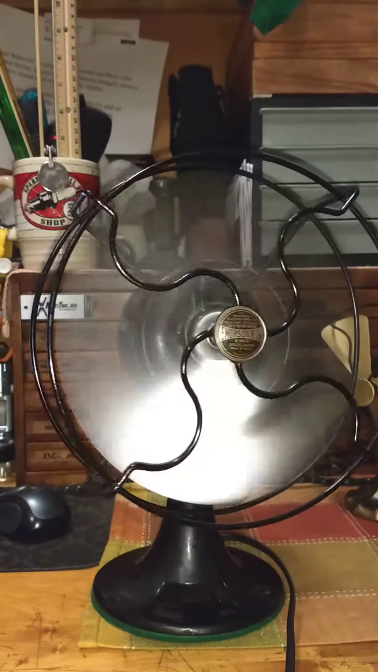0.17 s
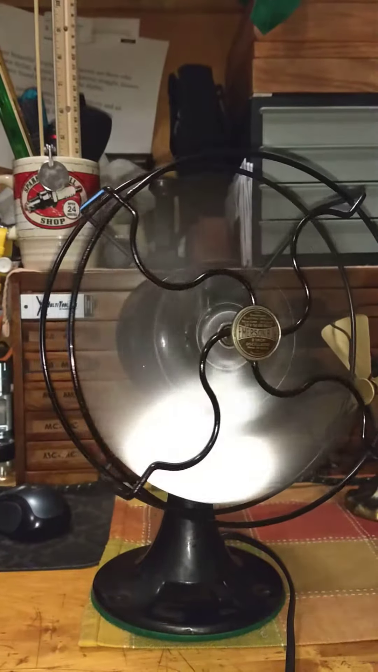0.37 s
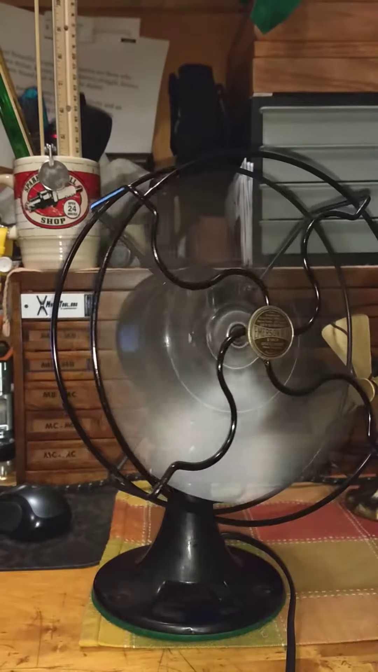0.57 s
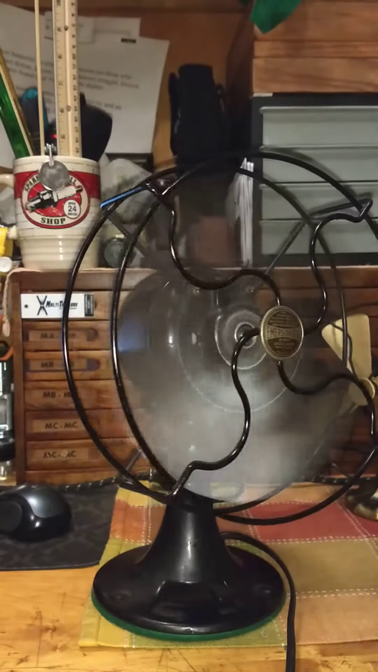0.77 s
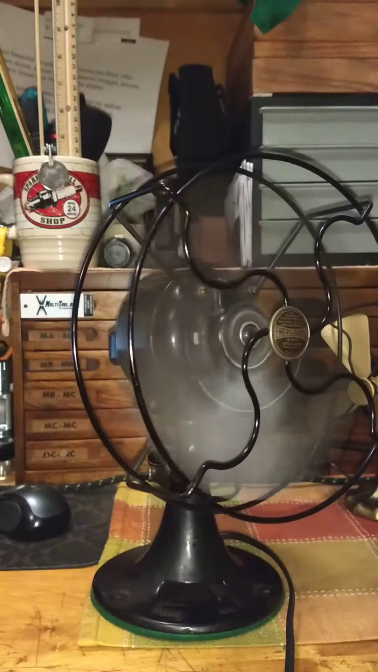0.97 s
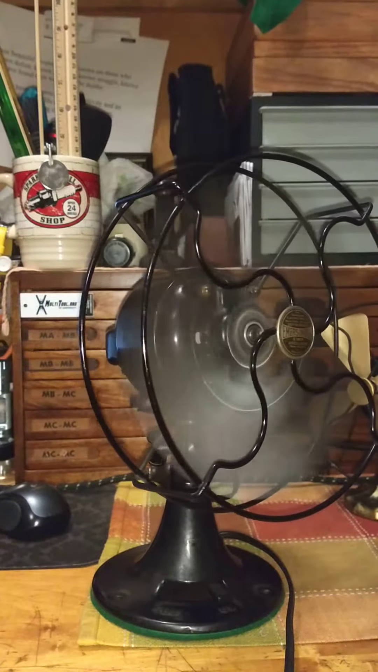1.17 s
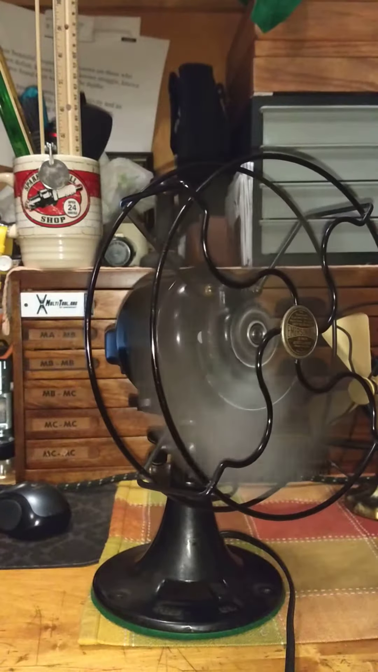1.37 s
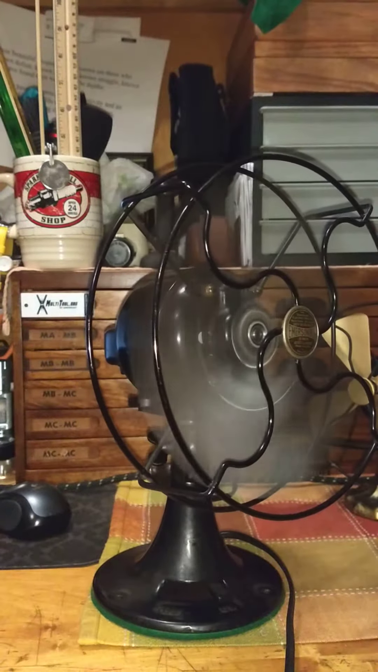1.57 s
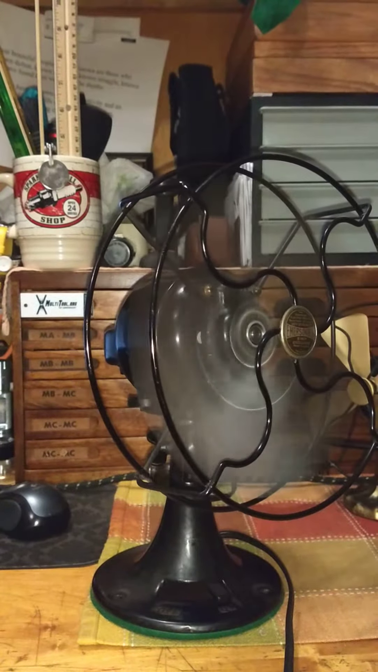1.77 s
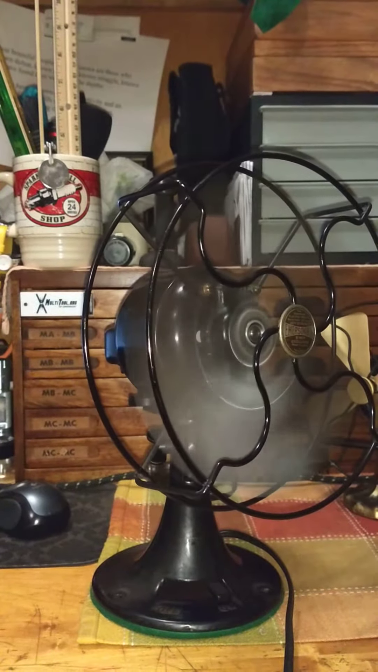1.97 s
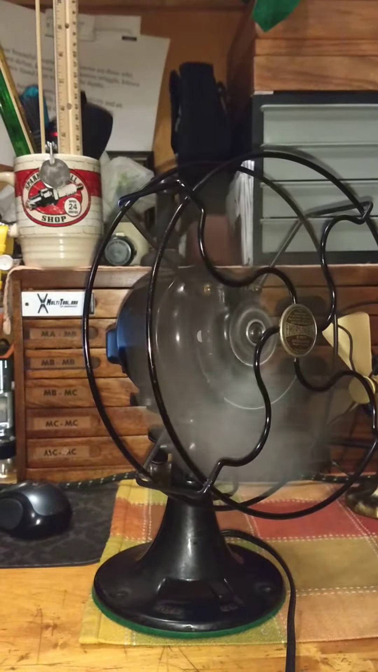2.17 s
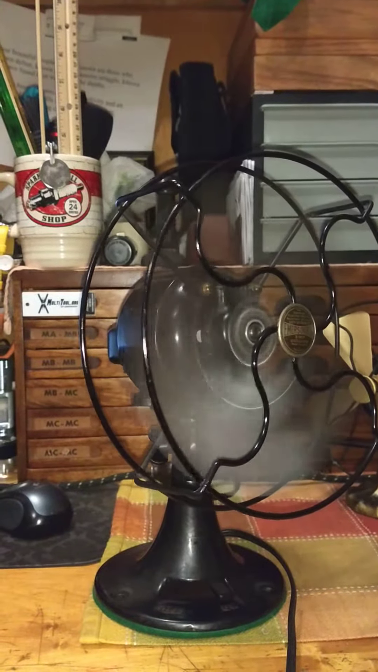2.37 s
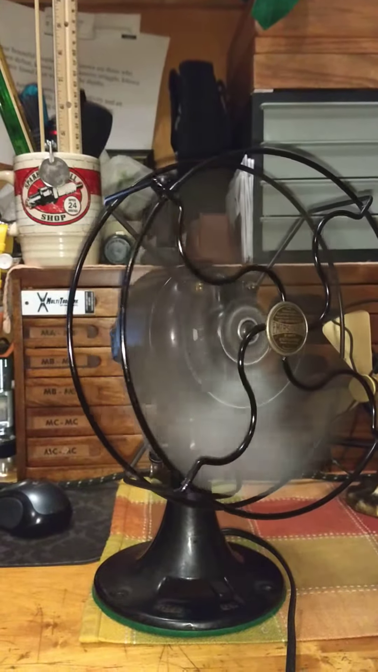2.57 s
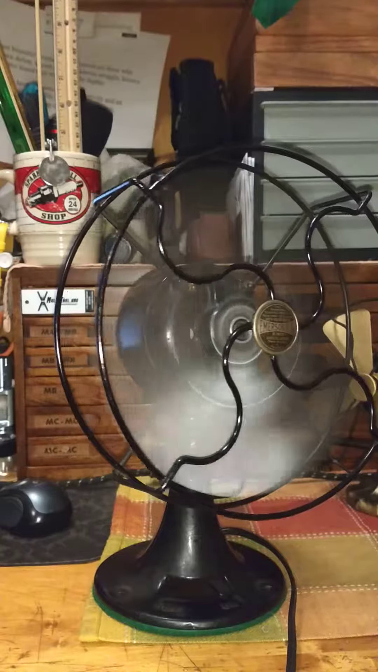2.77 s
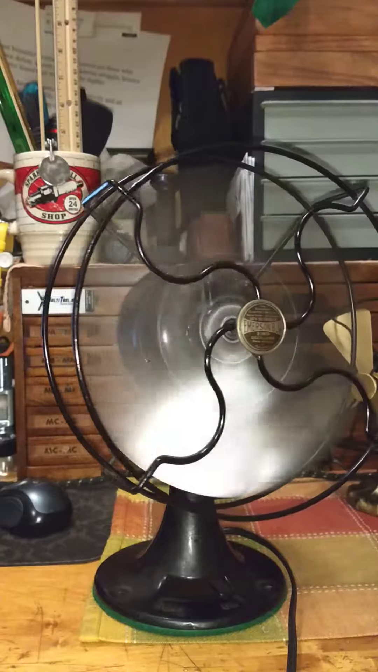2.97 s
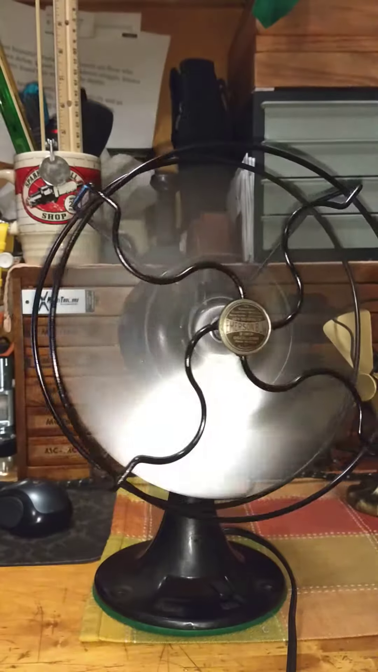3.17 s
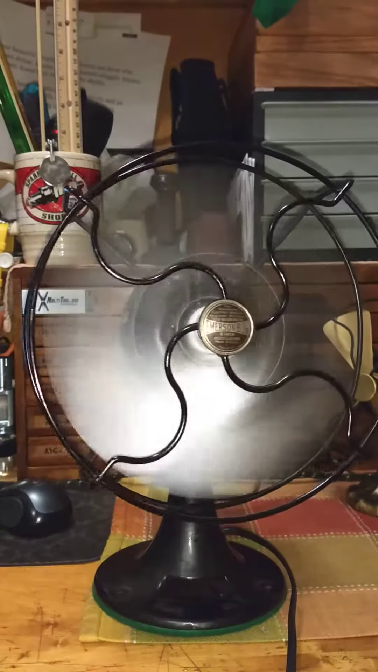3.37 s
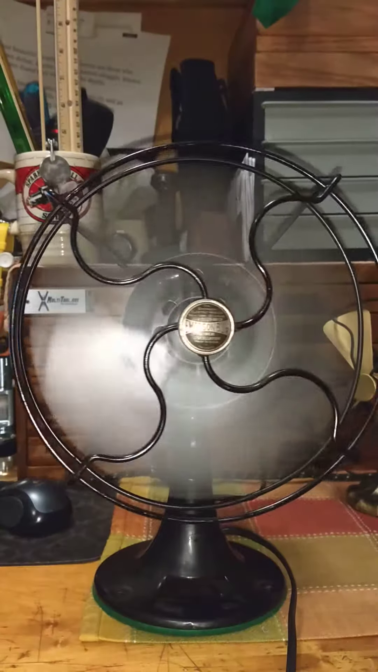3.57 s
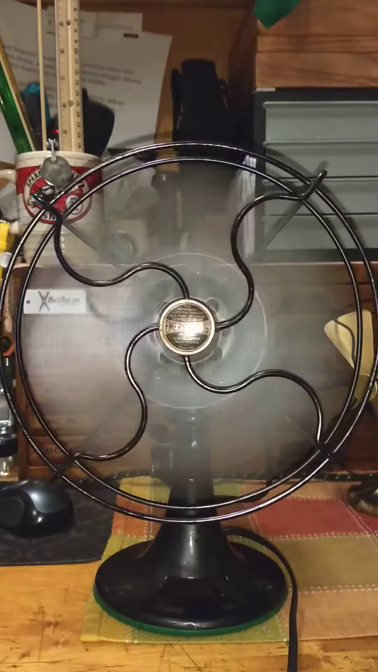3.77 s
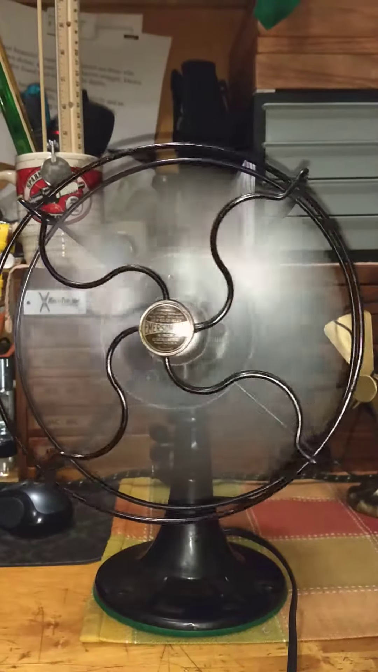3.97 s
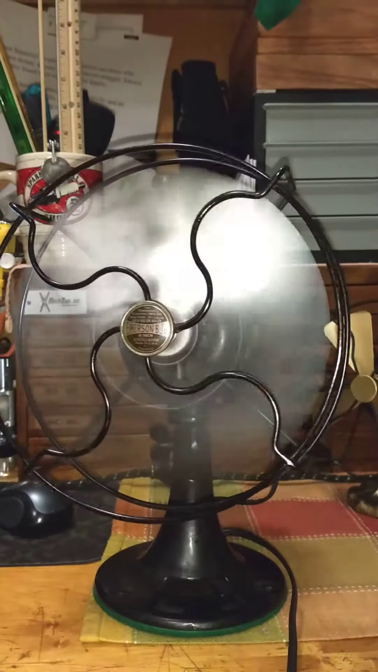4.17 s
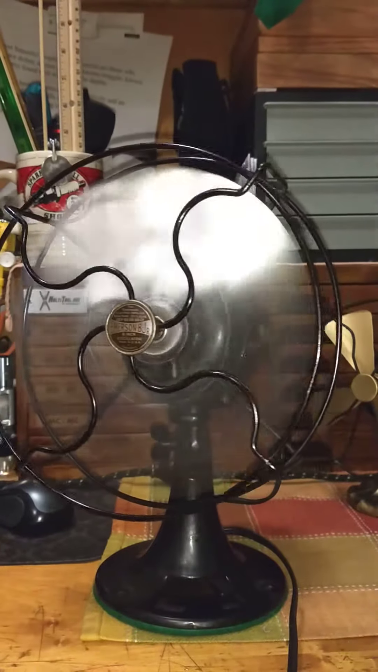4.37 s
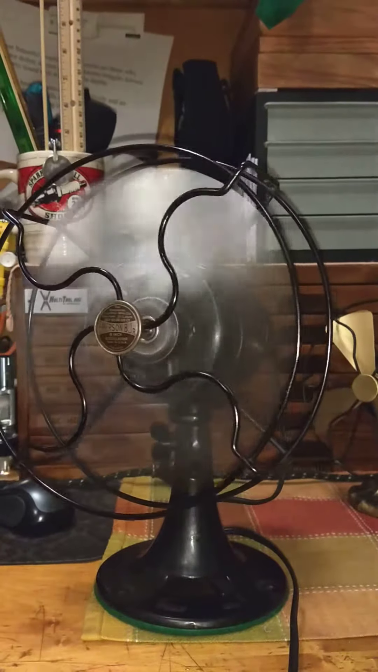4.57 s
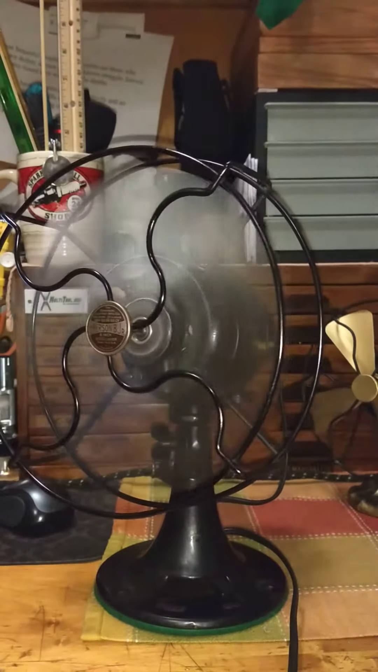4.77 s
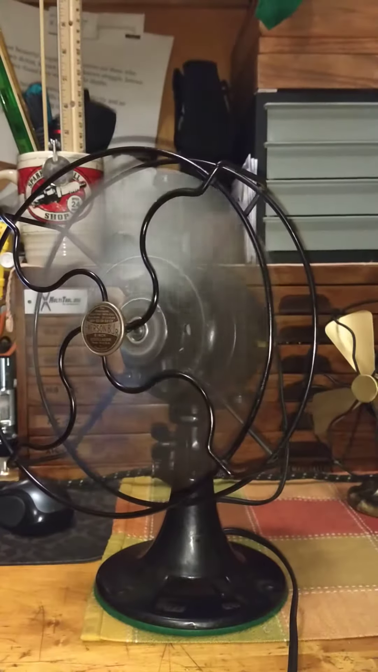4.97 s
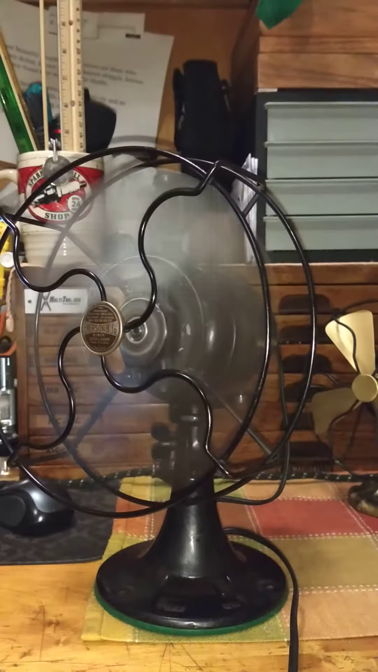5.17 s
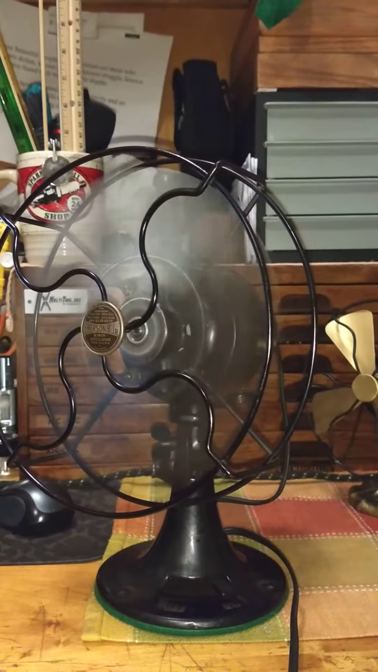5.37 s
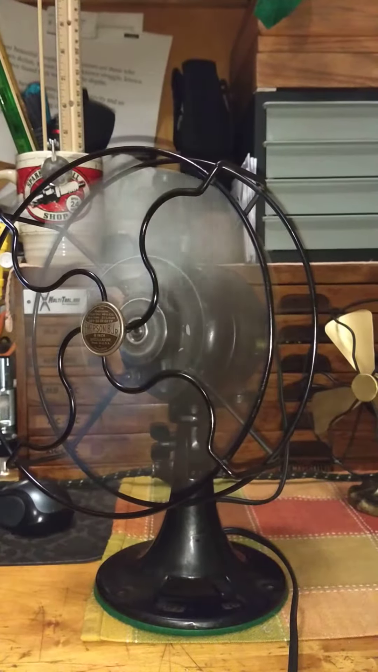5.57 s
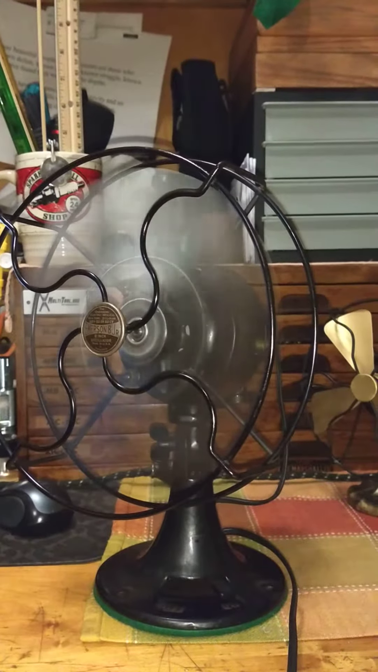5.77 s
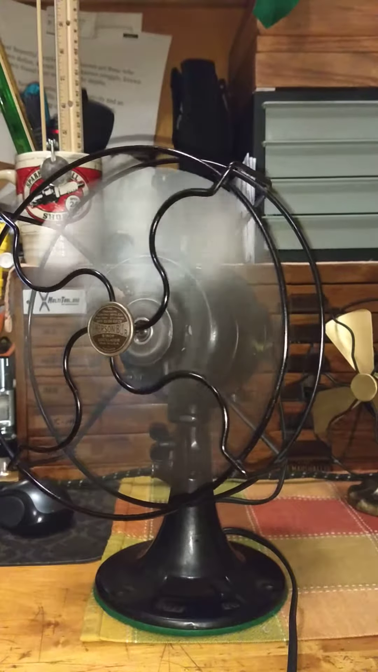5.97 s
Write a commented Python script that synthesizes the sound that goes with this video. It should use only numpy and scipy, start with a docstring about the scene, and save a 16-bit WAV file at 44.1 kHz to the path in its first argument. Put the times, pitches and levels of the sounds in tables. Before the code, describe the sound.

An old four-bladed desk fan runs without pause on a workbench indoors, close to a stereo microphone. Its steady low electric hum sits beneath a broad rush of air, faint wavering rotor tones and a slightly metallic ring. From 0 to about 0.45 s, quick dull wind thumps hit left and right, with the fan held down in level. They fade by 0.7 s, and the hum and rush gradually swell back. A higher casing buzz wavers, strongest around 2 s. Soft buffeting begins again near 3.3 s, becoming dense, low thumps by 3.5 s and the loudest, rougher, brighter blows around 3.9 to 4.4 s, ducking the whole fan. The gusts break off after 4.5 s, leaving a few weak puffs until 5 s. The hum and rush recover slowly, and the buzz swells again around 5.3 to 5.6 s before easing, with the fan still running.

```python
"""An old four-bladed desk fan swings from side to side on a workbench, humming and rushing throughout.
At first it has just faced the microphone: eddies thump on the two ports and the gain starts turned down.
The thumps die away as it turns aside; the fan swells back and its casing buzzes, strongly near 2 s.
Facing again near 3.8 s, it brings stronger thumps, and the gain control ducks everything.
Then it turns to the other side, the fan swells back and the buzz returns.
Tones are sines, air is filtered noise; left and right are the ports subtracted with a short delay."""
import sys
import numpy as np
from scipy import signal
from scipy.fft import rfft, irfft
from scipy.io import wavfile
from scipy.ndimage import uniform_filter1d, minimum_filter1d

SR = 44100
rng = np.random.default_rng(int(sys.argv[2]) if len(sys.argv) > 2 else 0)


def master_out(mix):
    """Clip the mix to full scale and print it as 16-bit PCM to the path in sys.argv[1]."""
    frames = np.transpose(np.atleast_2d(mix))
    ceiling = np.clip(frames, -1, 1)
    pcm = np.round(ceiling * 32767).astype(np.int16)
    wavfile.write(sys.argv[1], SR, pcm)


N = 264908
TIME = np.arange(N) / SR
MAINS_HZ = 60
SHAFT_HZ = 27.4   # turns of the rotor per second
ROTOR_WAVER_DB = 2.2   # spread of the slow wavering


def from_db(db):
    """Decibels to gain."""
    return 10 ** (np.asarray(db) / 20)


def on_log_axis(hz, points_hz, values):
    """Read a table at any frequency, in straight lines on a log frequency axis."""
    return np.interp(np.log(hz + 0.0012), np.log(points_hz), values)


def filtered(x, order, hz, kind):
    """Pass x through a smooth low, high or band filter."""
    return signal.sosfilt(signal.butter(order, hz, kind, fs=SR, output="sos"), x)


def drift(rate):
    """Random wandering of spread 1, changing about rate times a second."""
    hz = np.fft.rfftfreq(N, 1 / SR)
    noise = rfft(rng.standard_normal(N))
    slow = irfft(noise / (1 + (hz / rate) ** 4), N)
    return slow / slow.std()


def short_power(x, seconds):
    """Power under a sliding bell-shaped window."""
    window = np.hanning(int(seconds * SR))
    power = signal.fftconvolve(x ** 2, window[None] / window.sum(), "same", axes=1)
    return np.abs(power) + 1e-14


def at_ports(alike, opposed):
    """The pressure at the two ports from its common and its opposed part."""
    return np.array([alike + opposed, alike - opposed])


# the swing: a moment when the fan faces the ports, and the time from one side to the other
FACING_S, SWEEP_S = 3.8, 4.04


def swing(s):
    """How far the fan is turned: -1 left, 0 facing the ports, 1 right."""
    return np.sin(np.pi * (FACING_S - s) / SWEEP_S)


def turning(facing_db, left_db, right_db):
    """Gain of a source as the swing turns it from facing the ports to either side."""
    turned = swing(TIME)
    side_db = np.where(turned < 0, left_db, right_db)
    return from_db(facing_db + (side_db - facing_db) * turned ** 2)


def tones(table, base_hz, wander, waver_db):
    """Sines on multiples of one slightly wandering rate, each wavering in the moving air."""
    turn = 2 * np.pi * base_hz * np.cumsum(1 + wander * drift(2.1)) / SR
    out = np.zeros((2, N))
    for multiple, alike_db, opposed_db in table:
        angle = multiple * turn + rng.uniform(0, 2 * np.pi)
        alike = from_db(alike_db) * np.sin(angle)
        opposed = from_db(opposed_db) * np.cos(angle)
        out += np.sqrt(2) * at_ports(alike, opposed) * from_db(waver_db * drift(0.66))
    return out


# faint low tones, not tied to the shaft rate, before wandering and wavering:
# [f/Hz, level alike at both ports/dB, level opposed/dB]
LOW_TONES = [(92, -54.5, -61), (155.6, -46, -70.5)]


def low_tones():
    """Faint low tones, free of the shaft rate, wander a little in pitch and waver slowly in level."""
    return tones(LOW_TONES, 1.0, wander=0.0053, waver_db=ROTOR_WAVER_DB)


# magnetic hum of the motor, before the swing and wavering change it:
# [multiple of the mains, level alike at both ports/dB, level opposed/dB]
HUM_TONES = [(2, -27, -87), (4, -45, -69), (6, -55, -63), (8, -62, -58)]


def motor_hum():
    """The motor's magnetic pull hums on even multiples of the mains; the swing shades it."""
    gain = turning(facing_db=-4.5, left_db=-1.5, right_db=-4.5)
    return gain * tones(HUM_TONES, MAINS_HZ, wander=0.0005, waver_db=0.8)


# the higher buzz of the motor casing, before it swells and wavers:
# [multiple of the mains, level alike at both ports/dB, level opposed/dB]
BUZZ_TONES = [(10, -47, -63)]
# how the buzz swells and fades: [t/s, level/dB]
BUZZ_SWELL = [(0.6, -15), (0.9, -5), (1.45, -11.5), (1.8, 0), (2.1, 0.5), (2.45, -4), (3.3, -5.5),
              (3.8, -6.5), (4.7, -13), (5.3, -0.5), (5.6, 1.5), (5.9, -8.5)]


def casing_buzz():
    """The casing buzzes at ten times the mains, heard best near the ends of the swing."""
    swell_db = np.interp(TIME, *np.transpose(BUZZ_SWELL))
    return from_db(swell_db) * tones(BUZZ_TONES, MAINS_HZ, wander=0.0013, waver_db=1.6)


# tones of the rotor, before wavering:
# [multiple of the shaft rate, level alike at both ports/dB, level opposed/dB]
ROTOR_TONES = [(3.95, -57, -61.5), (8.04, -46.5, -74.5), (8.8, -62, -58.5), (10.15, -66.5, -56),
               (12.02, -47.5, -74), (15.95, -60.5, -60.5)]


def rotor_tones():
    """The turning blades beat the air, giving tones tied to the shaft rate."""
    return tones(ROTOR_TONES, SHAFT_HZ, wander=0.0024, waver_db=ROTOR_WAVER_DB)


# air rushing off the blades, at the ports, before the resonances:
# [f/Hz, level/dB per Hz, likeness of the two ports from -1 to 1]
RUSH_SPECTRUM = [(40, -81, 0.69), (71, -68, 0.54), (100, -64, 1), (159, -67, 0.82), (218, -59, 0.99),
                 (294, -70.5, 0.76), (384, -69, 1), (463, -74, 0.48), (730, -71.5, 0.56),
                 (1044, -75.5, 0.47), (1200, -71, 0.0019), (1400, -71.5, -0.14), (1940, -76, -0.14),
                 (2250, -72, 0.77), (3243, -79.5, -0.3), (6500, -91.5, 0.098), (8700, -100, -0.14),
                 (14900, -100.3, 0.26)]
# resonances of blades and guard that colour the rush: [f/Hz, width/Hz, boost/dB]
METAL_RESONANCES = [(660, 22, 2), (730, 13, 2.5), (787, 24, 2), (834, 20, 5), (869, 16, 7.5), (909, 30, 6),
                    (1067, 18, 9), (1090, 16, 5), (1350, 17, 0), (1518, 30, 3), (1730, 24, 1.5),
                    (1856, 40, 4)]


def rush(level_db=0.0, throb=0.05, flutter_db=0.36):
    """Turbulence off the blades, coloured by the metal; its hiss throbs once a turn."""
    hz = np.fft.rfftfreq(N, 1 / SR)
    points_hz, density_db, likeness = np.transpose(RUSH_SPECTRUM)
    colour_db = on_log_axis(hz, points_hz, density_db) + level_db
    for centre, width, peak_db in METAL_RESONANCES:
        colour_db = colour_db + peak_db / (1 + (2 * (hz - centre) / width) ** 2)
    alike = np.clip(on_log_axis(hz, points_hz, likeness), -.98, .98)
    # likeness shares the power between the common and the opposed part
    share = np.sqrt(SR / 2 * np.array([1 + alike, 1 - alike]) / 2)
    spectra = rfft(rng.standard_normal((2, N))) * from_db(colour_db) * share
    air = at_ports(*irfft(spectra, N))
    hiss = filtered(air, 1, 1800, "high")
    throbbing = air + throb * np.sin(2 * np.pi * SHAFT_HZ * TIME) * hiss
    return throbbing * from_db(flutter_db * drift(18.0))


def reflected(x, delay_s=0.006, sweep_s=0.00079, echo_db=-15.0):
    """A hard surface nearby returns the rush; the swing changes the path, sweeping a faint comb."""
    sent = TIME - delay_s - sweep_s * swing(TIME)
    echo = np.array([np.interp(sent, TIME, port, left=0) for port in x])
    return (x + from_db(echo_db) * echo) / np.hypot(1, from_db(echo_db))


def rushing_air(port_tilt_db=1.2):
    """The rush with its echo, shaded by the swing and a little stronger at the second port."""
    gain = turning(facing_db=1.0, left_db=0.52, right_db=0.34)
    tilt = from_db([[-port_tilt_db / 2], [port_tilt_db / 2]])
    return gain * reflected(rush()) * tilt


# travel time of the jet of air to the ports
JET_TRAVEL_S = 0.165
# the swing (share of the full turn) at which the jet's edge passes the ports, and the drop beyond it
JET_EDGE, JET_EDGE_DB = 0.325, -16.5


def jet_db(s, steepness=10.0, fringe_fall_db=2.0):
    """Strength of the draught at the ports: a flat core that drops at its edge to a fading fringe."""
    off_axis = np.abs(swing(s - JET_TRAVEL_S)) / JET_EDGE
    outside = 1 - 1 / (1 + off_axis ** steepness)
    return JET_EDGE_DB * outside - fringe_fall_db * off_axis ** 4


def rumble(level_db=-4.5, corner_hz=140, low_cut_hz=85, lumpy_db=3.5):
    """The dull churn between eddies: lumpy low noise, separate at each port."""
    noise = rng.standard_normal((2, N))
    churn = filtered(noise, 2, [low_cut_hz, corner_hz + low_cut_hz], "band")
    churn = filtered(churn, 2, 800, "low")
    churn = churn / np.sqrt(short_power(churn, 0.13).sum(0))   # even out its loudness
    return churn * from_db(jet_db(TIME) + level_db + lumpy_db * drift(21))


def small_eddies(per_s=60.0, level_db=-11.5, spread_db=1.0, core_hz=230, doubling_db=1.0,
                 spread_octaves=0.25):
    """Lesser eddies at uneven intervals; the stronger the draught, the louder and brighter."""
    chance = rng.standard_normal((400, 3))
    when = (np.arange(len(chance)) + chance[:, 0] / 2) / per_s
    strength_db = jet_db(when) + spread_db * chance[:, 1]
    octaves = strength_db / doubling_db + spread_octaves * chance[:, 2]
    corner_hz = np.maximum(core_hz * 2 ** octaves, 90)
    heard = (when > 0) & (when < N / SR) & (strength_db > -45)
    return np.transpose([when, strength_db + level_db, corner_hz])[heard]


def rounded_off(push, corner_hz, reach):
    """An eddy's spectrum slopes down from its corner and ends steeply at reach times the corner."""
    slope = signal.butter(1, corner_hz, fs=SR, output="sos")
    end = signal.butter(3, min(reach * corner_hz, SR / 4), fs=SR, output="sos")
    return signal.sosfilt(np.vstack([slope, slope, end]), push)


# the strongest eddies, and stray puffs beside the jet; small fast eddies have a higher corner:
# [t/s, peak level/dB before level_db and the wind filters, corner f/Hz]
STRONG_EDDIES = [(0.017, -1, 340), (0.032, -9, 201), (0.063, -0.5, 330), (0.072, 2, 160),
                 (0.092, -5.5, 323), (0.112, -1.5, 135), (0.126, -3, 260), (0.143, -4, 275),
                 (0.162, 4, 140), (0.184, -6, 170), (0.212, -1.5, 135), (0.232, -6.5, 220),
                 (0.246, -2, 200), (0.277, -1.5, 257), (0.311, -4, 337), (0.319, -2.5, 216),
                 (0.335, -11.5, 170), (0.365, -1.5, 170), (0.389, -4, 180), (0.423, -11, 250),
                 (0.429, -2.5, 115), (0.443, -12, 140), (0.480, -11, 100), (0.535, -16.5, 95),
                 (0.568, -17, 115), (0.596, -26, 90), (0.618, -22, 120), (0.647, -16.5, 120),
                 (0.711, -19, 105), (3.309, -14, 107), (3.346, -21, 106), (3.391, -14.5, 91),
                 (3.425, -12.5, 128), (3.445, -8.5, 106), (3.462, -3, 120), (3.488, -8, 139),
                 (3.501, 0, 125), (3.510, -4, 116), (3.527, -3.5, 90), (3.550, 1.5, 116),
                 (3.576, -1.5, 261), (3.583, 4, 130), (3.601, -3, 125), (3.618, -2, 91.5),
                 (3.637, -2.5, 200), (3.660, 2.5, 180), (3.690, -11, 202), (3.702, -3, 94.4),
                 (3.726, -11, 149), (3.744, -1.5, 217), (3.769, -7.5, 405), (3.780, -2.5, 220),
                 (3.807, -4.5, 88.6), (3.838, 0, 322), (3.856, -12.5, 403), (3.898, -1, 260),
                 (3.914, 4, 213), (3.927, 0.5, 214), (3.948, -4, 301), (3.975, 8.5, 180), (3.993, 1, 240),
                 (4.004, 5, 650), (4.024, 8.5, 270), (4.035, 0, 200), (4.075, -2, 440), (4.086, 7, 220),
                 (4.108, 0.5, 280), (4.124, 3, 300), (4.143, 0.5, 180), (4.166, -7, 520), (4.192, 3, 170),
                 (4.211, -0.5, 450), (4.228, 1.5, 278), (4.246, 0.5, 280), (4.286, 1, 370),
                 (4.296, 3.5, 200), (4.328, -0.5, 470), (4.338, 4.5, 360), (4.361, 0, 300),
                 (4.387, 0.5, 400), (4.428, -17, 120), (4.492, -0.5, 280), (4.511, -4, 214),
                 (4.527, -16, 189), (4.556, -9.5, 126), (4.619, -28, 140), (4.698, -18, 123),
                 (4.886, -20, 170), (4.911, -15, 221), (4.924, -12.5, 190), (4.956, -22, 170),
                 (4.971, -18, 210), (4.987, -28, 88)]


def buffeting(level_db=5.5, rise_s=0.0034, fall_s=0.0054, typical_hz=250, lingering=0.45,
              low_cut_hz=100, reach=2.25, slap_db=-2.5, slap_lead_s=0.0022):
    """Each eddy slaps one port once inside a short lump of turbulence; big dull ones linger."""
    size = 4096   # samples per eddy
    age = (np.arange(size) - size // 2) / SR
    when, peak_db, corner_hz = np.vstack([STRONG_EDDIES, small_eddies()]).T
    stretch = (typical_hz / corner_hz[:, None]) ** lingering
    swell = 1 / np.cosh(age / (stretch * np.where(age < 0, rise_s, fall_s)))
    turbulence = swell * rng.standard_normal((len(when), size))
    push = turbulence / np.sqrt(np.sum(swell ** 2, 1, keepdims=True))
    push[:, size // 2] += from_db(slap_db) * rng.choice([-1, 1], len(when))
    lumps = np.array([rounded_off(row, hz, reach) for row, hz in zip(push, corner_hz)])
    lumps = filtered(lumps, 2, low_cut_hz, "high")
    # an eddy's level is that of its strongest moment, counting the pressure and how fast it changes
    typical_rate = 2 * np.pi * np.hypot(corner_hz, low_cut_hz)[:, None]
    slope = np.gradient(lumps, axis=1) * SR / typical_rate
    strongest = short_power(np.hypot(lumps, slope), .012).max(1, keepdims=True)
    lumps = lumps / np.sqrt(strongest / 2)
    out = np.zeros((2, N + 2 * size))
    for k, (s, db, lump) in enumerate(zip(when, peak_db, lumps)):
        start = int((s - slap_lead_s) * SR) + size // 2
        out[k % 2, start:start + size] += from_db(db + level_db) * lump   # ports take turns
    return out[:, size:size + N]


def wind(low_hz=60, high_hz=1300, dip_hz=750, dip_db=-5.0):
    """Draught and eddies; the small ports weaken the deepest and finest, and dull the middle."""
    air = filtered(rumble() + buffeting(), 4, [low_hz, high_hz], "band")
    middle = signal.lfilter(*signal.iirpeak(dip_hz, 1, fs=SR), air)
    return air + (from_db(dip_db) - 1) * middle


def scene():
    """Fan and wind added up as pressure at the two ports."""
    motor = motor_hum() + casing_buzz()
    rotor = rotor_tones() + low_tones()
    return motor + rotor + rushing_air() + wind()


def gain_control(x, limit_db=-10.0, hold_s=0.1, release_db_per_s=10.5, start_db=11.5):
    """Loud moments turn the gain down quickly; it holds, then creeps back. It starts turned down."""
    power = short_power(x, .02).mean(0)
    excess = np.maximum(10 * np.log10(power) - limit_db, 0)
    excess[0] = start_db
    hold = int(hold_s * SR) // 2
    # the largest excess within the hold time just past
    held = -minimum_filter1d(-excess, 2 * hold + 1, origin=hold, mode="nearest")
    crept_db = release_db_per_s * TIME
    cut_db = np.maximum.accumulate(held + crept_db) - crept_db
    return x * from_db(-uniform_filter1d(cut_db, size=1400))


# left-right level balance at each frequency: [f/Hz, left minus right level/dB]
BALANCE = [(150, 0.5), (500, -0.1), (1100, 0.5), (1500, 2.5), (2100, 0.5), (4200, -3.5), (6000, 0),
           (15000, 0.5)]


def record(dry, port_lag=20, crossfeed=.84, cutoff_hz=15750):
    """Each channel is one port minus most of the other, delayed; then gain, rounded peaks, top cut."""
    delayed = np.pad(dry[::-1], ((0, 0), (port_lag, 0)))[:, :N]   # other port, lag in samples
    pair = (dry - crossfeed * delayed) / (1 + crossfeed)
    hz = np.fft.rfftfreq(N, 1 / SR)
    balance_db = on_log_axis(hz, *np.transpose(BALANCE))
    balanced = irfft(rfft(pair) * from_db([balance_db / 2, -balance_db / 2]), N)
    level = gain_control(balanced)
    rounded = level / (1 + (level / .9) ** 8) ** (1 / 8)
    top_cut = signal.ellip(10, .1, 80, cutoff_hz, fs=SR, output="sos")
    return signal.sosfilt(top_cut, rounded)


dry = scene()
out = record(dry)
master_out(out)
```